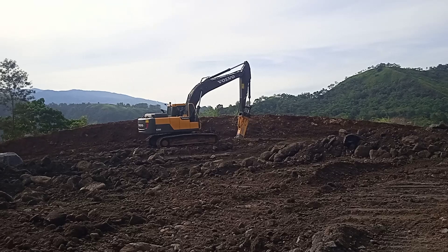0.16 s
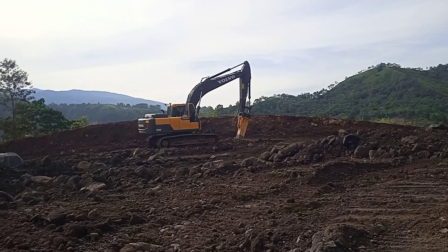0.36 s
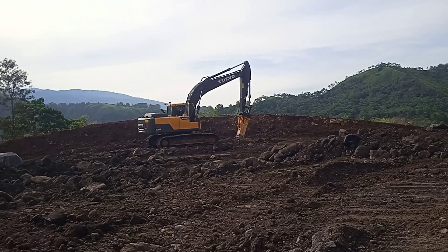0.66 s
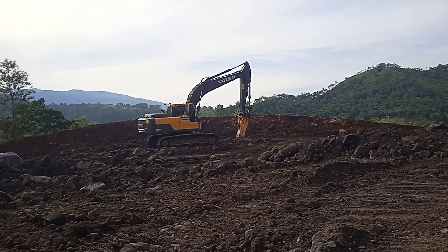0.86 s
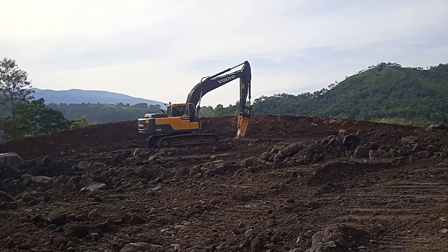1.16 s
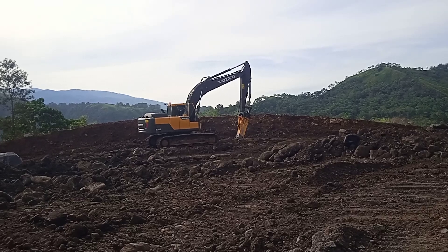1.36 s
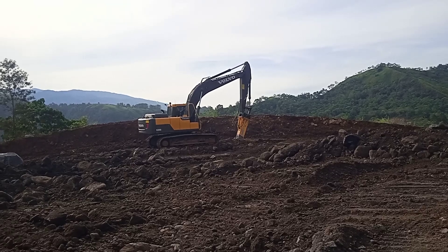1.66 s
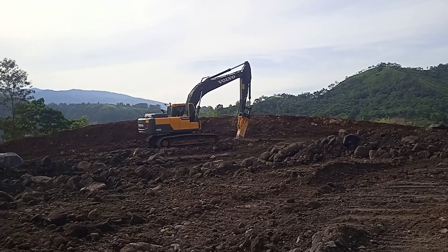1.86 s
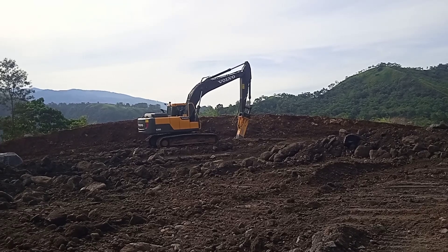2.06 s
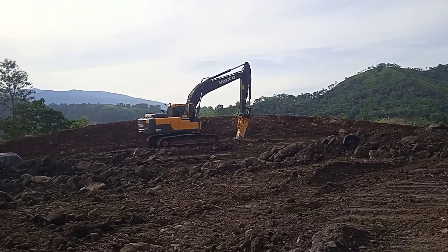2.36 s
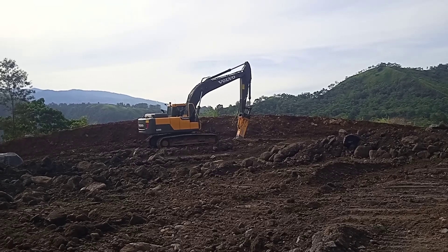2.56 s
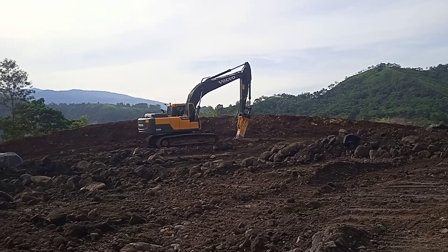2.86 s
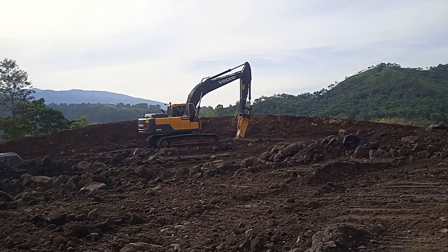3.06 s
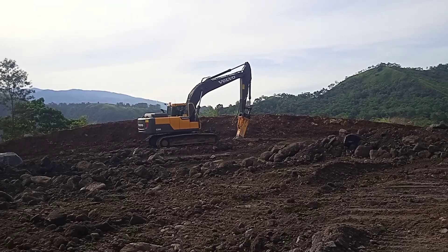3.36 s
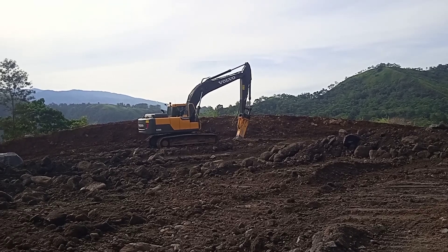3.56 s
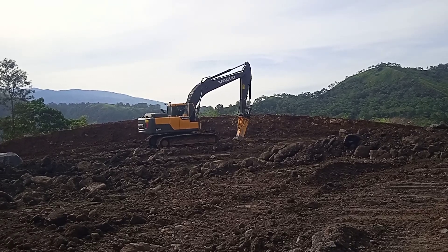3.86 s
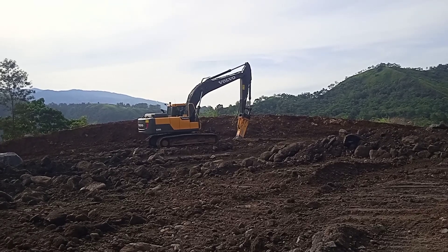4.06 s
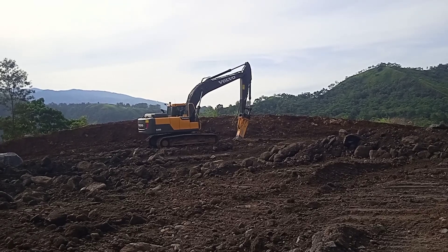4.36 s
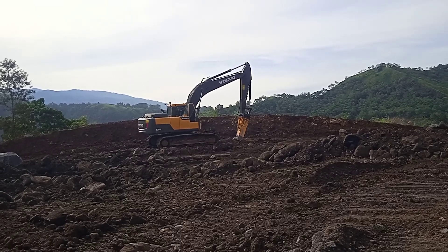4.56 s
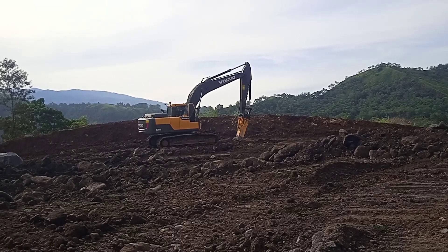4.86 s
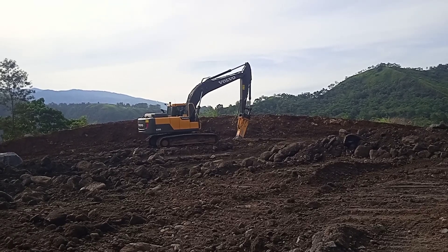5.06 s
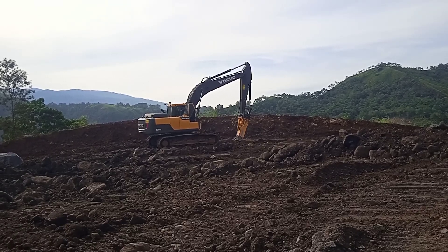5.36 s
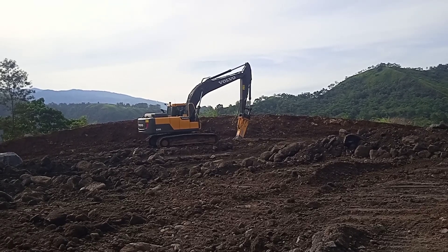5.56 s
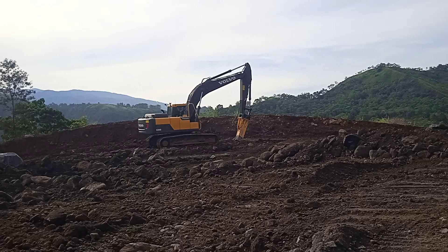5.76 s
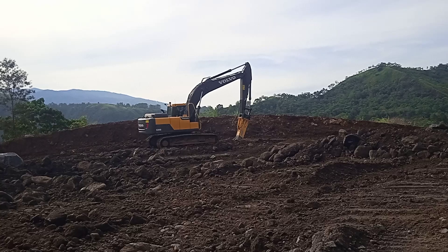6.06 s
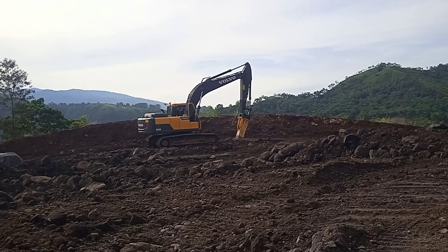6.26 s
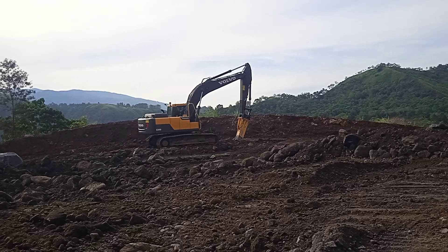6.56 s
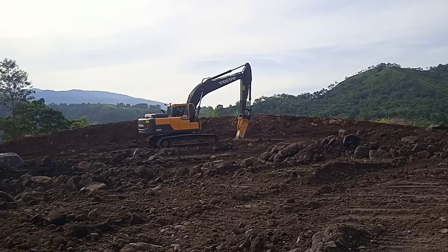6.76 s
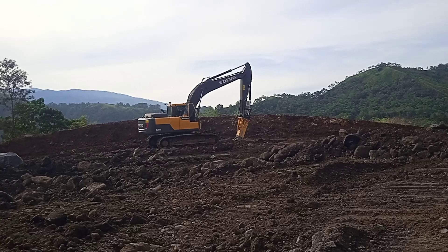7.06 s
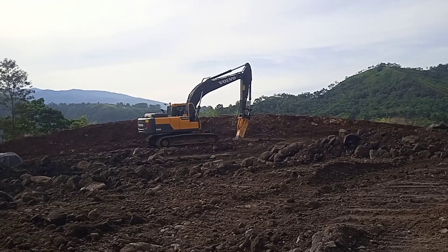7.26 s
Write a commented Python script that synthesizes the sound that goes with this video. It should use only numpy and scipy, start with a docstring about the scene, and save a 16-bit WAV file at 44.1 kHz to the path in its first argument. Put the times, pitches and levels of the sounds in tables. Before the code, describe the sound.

An excavator's hydraulic hammer pounds rock in rapid, rattling metallic blows over a diesel drone, pausing briefly midway before hammering again.

```python
"""An excavator breaks rock on open ground, some way off. From the start its hydraulic hammer pounds
nearly eight times a second over the diesel: the valve hisses, the piston cracks, the steel housing
rattles and rings, the ground thumps. After two seconds the rock crumbles and the chisel works loose,
clanking, then squealing. Just past four seconds the pounding stops, leaving three light hammer taps
over the diesel; near five it starts again and runs to the end."""
import sys
import numpy as np
from scipy import signal
from scipy.fft import rfft, irfft
from scipy.io import wavfile

SR = 44100
rng = np.random.default_rng(int(sys.argv[2]) if len(sys.argv) > 2 else 0)


def int16_out(signal):
    """Quantize to a 16-bit WAV file."""
    q = np.round(np.clip(np.atleast_2d(signal).T, -1, 1) * 32767)
    wavfile.write(sys.argv[1], SR, q.astype(np.int16))


N = 326781
TIME = np.arange(N) / SR
AGE = TIME[:SR // 3]   # seconds since a hit

# runs of the hammer: start_s, blow_count, interval_s, extra_starting_interval_s
HAMMER_RUNS = [(.0475, 33, .1285, .0034), (4.9477, 20, .12741, .0072)]
# weight and brightness of the blows: time_s, force_db, clank_db, treble_db
BLOW_LEVELS = [(0, -29, -24.5, -28), (1.0, -27.5, -26.5, -26.5), (2.0, -27.3, -27, -28),
               (3.1, -27, -27, -28.5), (4.1, -27.5, -27, -28.5), (4.95, -30, -26.5, -27),
               (5.2, -30, -32, -28.5), (6.0, -31.5, -30, -26), (6.75, -31.5, -31.5, -29.5),
               (7.41, -29, -27.5, -31.5)]
# rattle envelope by band: centre_hz, rise_s, hold_s, t60_s, likeness to the blow before (0-1)
RATTLE_BANDS = [(200, 0.013, 0.024, 0.078, 0.89), (508, 0.0093, 0.026, 0.37, 0.83),
                (830, 0.0033, 0.025, 0.18, 0.57), (1695, 0.0032, 0.016, 0.13, 0.52),
                (3420, 0.0033, 0.018, 0.15, 0.42), (6260, 0.0017, 0.017, 0.12, 0.77),
                (14900, 0.0028, 0.011, 0.065, 0.89)]
# tone colour of the rattle: frequency_hz, gain_db
HOUSING_EQ = [(100, -21), (200, -6), (300, 0), (450, 1.5), (700, -7.5), (1150, -3), (1600, 4.5),
              (2200, -2.5), (3400, -2.5), (4700, -9), (7300, -5), (8300, -17), (12500, -29.5), (14000, -25),
              (15300, -14)]
# broad resonances of the housing: centre_hz, width_hz, boost_db
HOUSING_PEAKS = [(1450, 140, 5), (2450, 250, 7.5), (2875, 280, 4.5), (3330, 230, 0.5), (3685, 133, 9),
                 (6455, 140, 7)]
# tone colour of steel hitting steel: frequency_hz, gain_db
KNOCK_EQ = [(150, -10), (400, 1.5), (800, 12.5), (1150, 4), (1500, 7.5), (3400, 8), (4700, 0), (6300, 5.5),
            (8500, -5.5), (12500, -24), (15300, -10)]
# ringing modes of housing and boom: pitch_hz, gain_db
STEEL_MODES = [(347, -16), (402, -15.5), (432, -20), (462, -15.5), (505, -12), (543, -16), (833, -16),
               (898, -16.5), (990, -9), (1191, -26), (1337, -7.5), (1520, -12.5), (1935, -14), (2256, -17),
               (2397, -7), (2547, -15.5), (3262, -15.5), (3385, -16.5), (3712, -29), (4152, -27),
               (5510, -14.5), (8835, -22.5), (9305, -21)]
# low-end weight as the chisel settles: time_s, thump_gain_db, boom_gain_db
LOW_END = [(0, 6.5, 2), (1.08, -1, -0.5), (1.22, 3, 5.5), (1.75, -1, -1), (2.3, 6.5, 2), (2.8, 0, 2.5),
           (5.3, 5, 3.5), (5.7, -2, -1), (7.41, -0.5, 4.5)]
# tone colour of the ground thump: frequency_hz, gain_db
THUMP_EQ = [(25, -11), (45, -16), (60, 3.5), (85, 5.5), (120, 5.5), (160, 15), (200, -9.5), (400, -28.5)]
# tone colour of falling chips: frequency_hz, gain_db
GRAVEL_EQ = [(250, 0), (600, 0.5), (1000, 2), (1700, 3.5), (2100, -5.5), (3200, -9), (8000, -24),
             (13000, -45)]
# spills of broken rock: start_s, length_s, level_db
ROCK_SPILLS = [(0, 0.13, -40), (2.355, 0.56, -46), (3.25, 0.66, -42.5)]
# pieces of stone cracking off: start_s, level_db
ROCK_CRUNCHES = [(1.555, -39), (3.356, -34), (3.744, -34), (3.922, -36), (5.375, -36.5)]
# tone colour of the oil hiss: frequency_hz, gain_db
VALVE_EQ = [(500, -38), (1500, -13), (3000, 6), (4500, -17), (7000, 2.5), (9000, -9.5), (12500, -21),
            (15300, -7)]
# notes from glancing blows: start_s, pitch_hz, level_db
GLANCING_PINGS = [(.312, 3730, -31), (1.226, 505, -26.5), (2.386, 990, -25), (2.515, 2400, -31.5),
                  (6.641, 5500, -35), (7.04, 5491, -41)]
# clanks of the loose chisel, then three light hammer taps in the last rows: start_s, knock_db, ring_db
CLANKS_AND_TAPS = [(2.219, -35.5, -48.5), (2.407, -36, -54), (2.547, -31.5, -53), (2.684, -29.5, -54),
                   (2.853, -35, -65), (3.324, -27, -51), (3.464, -29, -51.5), (3.595, -30, -50.5),
                   (3.722, -25, -51), (3.851, -29.5, -50), (3.982, -31.5, -55), (4.109, -31, -52),
                   (4.249, -31.5, -56), (4.41, -32.5, -53), (4.567, -32.5, -55), (4.793, -33.5, -59)]
# ringing modes of the chisel: pitch_hz, gain_db, t60_s
CHISEL_MODES = [(2430, 5, 0.25), (3210, 5, 0.3), (5900, 12.5, 0.17)]
# the chisel rubbing on rock: start_s, length_s, screech_db, singing_db
CHISEL_RUBS = [(3.251, 0.045, -64, -41), (3.312, 0.03, -58, -34), (3.755, 0.021, -39.5, -42),
               (3.794, 0.045, -54, -35.5), (3.876, 0.027, -56, -35), (4.016, 0.026, -76, -47),
               (4.164, .04, -74, -53), (4.26, 0.032, -72, -44)]
# high cluster of the screech: pitch_hz, gain_db
SCREECH_TONES = [(4301, -3), (6481, -2), (7440, -1), (8258, -1), (8635, -4), (10842, -16), (11117, -11),
                 (11423, -7), (13754, -6), (14233, -2), (14700, -8), (15009, -7), (15450, -9)]
# engine speed, sagging under load: time_s, firing_hz
ENGINE_SPEED = [(0.0, 76.7), (0.2, 76.8), (0.95, 83.77), (1.28, 83.1), (1.83, 80.34), (2.4, 81.27),
                (3.05, 86.8), (3.5, 85.7), (3.9, 81.2), (4.15, 80.9), (5.04, 89), (5.47, 88.17),
                (7.41, 90.4)]
# overtones of the exhaust: time_s, second_harmonic_db, third_harmonic_db
EXHAUST_OVERTONES = [(0, -44.5, -41.5), (1.3, -47, -51), (1.9, -47, -43), (3.2, -51.5, -60.5),
                     (4.15, -47, -48), (5.2, -41.5, -49.5), (7.41, -43, -55)]
# tone colour of exhaust and fan noise: frequency_hz, gain_db
ROAR_EQ = [(20, -53), (45, -12), (60, 0.5), (100, 5), (150, 0), (240, 3.5), (330, -8), (600, -7.5),
           (1500, -16), (3000, -25), (7000, -31.5), (13000, -52), (15300, -36)]

TWIN_OFFSET_HZ, TWIN_DB = 48, -10   # each chisel mode beats against a close, quieter twin


def hammer_blows(build_up_blows=3, slowing_s_per_blow=.000083, spread_db=1.1):
    """Time and force of each blow: a run starts sluggishly as oil pressure builds, later slows a touch."""
    times = []
    for start, count, interval, extra_interval in HAMMER_RUNS:
        blow = np.arange(count)
        build_up = extra_interval * build_up_blows * (1 - np.exp(-blow / build_up_blows))
        times.extend(start + interval * blow + build_up + slowing_s_per_blow * blow ** 2 / 2)
    times = np.array(times)
    return times, at_times(BLOW_LEVELS, times)[0] + spread_db * rng.standard_normal(len(times))


def piston_crack(times, force_db, trim_db=-1, t60_s=0.0093):
    """The piston meets the chisel with a hard crack, ahead of the rattle."""
    snaps = rng.standard_normal((len(times), len(AGE))) * from_db(-60 * AGE / t60_s)
    return colour(place(times, snaps * from_db(force_db + trim_db)[:, None]), KNOCK_EQ)


def housing_rattle(times, force_db, trim_db=2.0, scatter_db=-26.5):
    """Each blow rattles the housing, the lows swelling later; the slopes scatter a faint tail back."""
    _, clank_db, treble_db = at_times(BLOW_LEVELS, times)
    log_centres = np.log([row[0] for row in RATTLE_BANDS])
    log_hz = np.log(np.arange(len(AGE) // 2 + 1) * SR / len(AGE) + 1)
    scatter = from_db(scatter_db) * burst(0.018, 0.045, 0.86)
    blows = 0
    for solo, (hz, rise, hold, t60, likeness) in zip(np.eye(len(RATTLE_BANDS)), RATTLE_BANDS):
        crossover = np.sqrt(np.interp(log_hz, log_centres, solo))
        favoured = favoured_modes(len(times)) if hz > 1000 else 1
        noise = irfft(rfft(repeated_noise(likeness, len(times))) * crossover * favoured, len(AGE))
        band_db = treble_db if 5000 < hz < 10000 else clank_db if hz > 2700 else force_db
        envelope = np.hypot(burst(rise, hold, t60), scatter)
        blows += noise * envelope * from_db(band_db + trim_db)[:, None]
    return colour(place(times, blows), HOUSING_EQ, HOUSING_PEAKS)


def favoured_modes(count, spacing_hz=75, spread_db=4.0, likeness=0.932):
    """Each blow favours its own handful of the housing's many close modes: one EQ curve per blow."""
    mode_index = np.arange(len(AGE) // 2 + 1) * SR / len(AGE) / spacing_hz
    gains = from_db(spread_db * repeated_noise(likeness, count))
    return unit_rms(np.array([np.interp(mode_index, np.arange(len(AGE)), row) for row in gains]))


def steel_ring(times, force_db, trim_db=-0.5, shift_db=3.0, spread_db=4.0):
    """Housing and boom ring at fixed pitches; which ones stand out shifts as the chisel settles."""
    boom_db = -27.5 + at_times(LOW_END, times)[1]
    band_hz, *rise_hold_t60, _ = np.transpose(RATTLE_BANDS)
    tones, strengths = [], []
    for hz, gain_db in STEEL_MODES:
        envelope = burst(*[np.interp(hz, band_hz, column) for column in rise_hold_t60])
        tones.append(envelope * np.exp(2j * np.pi * hz * AGE))
        settling_db = shift_db * np.tanh(np.interp(times, TIME, drift(0.83)))
        accent_db = spread_db * rng.uniform(-1.07, 1, len(times))
        phase = rng.uniform(0, 2 * np.pi) + 1.24 * rng.standard_normal(len(times))
        drive_db = boom_db if hz < 700 else force_db
        strength = from_db(drive_db + gain_db + trim_db + settling_db + accent_db)
        strengths.append(strength * np.exp(1j * phase))
    return place(times, (np.transpose(strengths) @ np.array(tones)).real)


def ground_thump(times, force_db, trim_db=-8):
    """The rock takes each blow with a dull thump."""
    thump_db = force_db + trim_db + at_times(LOW_END, times)[0]
    thumps = repeated_noise(likeness=0.82, count=len(times)) * burst(0.00026, 0.01, 0.14)
    return colour(place(times, thumps * from_db(thump_db)[:, None]), THUMP_EQ)


def crumbling_rock(times, force_db, trickle_db=-18.5, grains_per_s=1000):
    """Every blow sheds a trickle of chips; now and then a piece cracks off or the rock spills."""
    # the three envelopes add as power
    trickle = place(times, np.outer(from_db(force_db + trickle_db), burst(0.027, 0.034, 0.88)) ** 2)
    spills = sum((from_db(db) * swell(start, length, rise_s=0.02, t60_s=2.3)) ** 2
                 for start, length, db in ROCK_SPILLS)
    crunch_s, crunch_db = np.transpose(ROCK_CRUNCHES)
    crunches = place(crunch_s, np.outer(from_db(crunch_db), burst(0.0049, 0.018, 0.18)) ** 2)
    clicks = (rng.random(N) < grains_per_s / SR) * rng.choice([-1, 1], N)
    size_db = 3 * np.minimum(rng.exponential(1, N), 2)
    clump_db = 2.5 * drift(8.8)
    gravel = unit_rms(colour(clicks * from_db(size_db + clump_db), GRAVEL_EQ))
    return gravel * np.sqrt(trickle + spills + crunches)


def valve_hiss(times, lead_s=.031, level_db=-45.5, spread_db=3.0):
    """Oil spurts through the valve just before each blow, as the piston turns round."""
    spurts = rng.standard_normal((len(times), len(AGE))) * burst(0.0051, 0.0084, 0.072)
    spurt_db = level_db + spread_db * rng.standard_normal((len(times), 1))
    return colour(place(times - lead_s, spurts * from_db(spurt_db)), VALVE_EQ)


def glancing_pings():
    """A glancing blow makes one mode of the steel ring out as a clear note."""
    envelope = burst(0.0034, 0.0087, 0.13)
    notes = [from_db(db) * envelope * np.sin(2 * np.pi * hz * AGE) for _, hz, db in GLANCING_PINGS]
    return place([row[0] for row in GLANCING_PINGS], notes)


def clanks_and_taps(ring_trim_db=2.5, spread_db=1.5):
    """The chisel knocks in its bushing or takes a light hammer tap: a clatter, then a beating ring."""
    times, knock_db, ring_db = np.transpose(CLANKS_AND_TAPS)
    envelope = np.hypot(burst(0.00052, 0.0042, 0.056), from_db(-8) * burst(0.0061, 0.018, 0.17))
    clatter = rng.standard_normal((len(times), len(AGE))) * envelope * from_db(knock_db)[:, None]
    rings = 0
    for hz, gain_db, t60 in CHISEL_MODES:
        strength = from_db(ring_db + gain_db + ring_trim_db - spread_db * rng.standard_normal(len(times)))
        twin_phase = 2 * np.pi * ((hz + TWIN_OFFSET_HZ) * AGE + rng.random((len(times), 1)))
        pair = np.sin(2 * np.pi * hz * AGE) + from_db(TWIN_DB) * np.sin(twin_phase)
        rings += strength[:, None] * pair * burst(0.00061, 0.011, t60)
    return colour(place(times, clatter), KNOCK_EQ) + place(times, rings)


def chisel_squeal(roughness=0.41, overtone_db=-15):
    """Steel slides on stone: the rod sings in a beating pair and an overtone, with a screech on top."""
    def rough_tone(hz, wander_hz=28):
        flutter = 1 + roughness * np.tanh(drift(110))
        return flutter * np.sin(2 * np.pi * np.cumsum(hz + wander_hz * drift(72)) / SR)
    screech_level, singing_level = 0, 0
    for start, length, screech_db, singing_db in CHISEL_RUBS:
        rub = swell(start, length, rise_s=0.003, t60_s=0.34)
        screech_level = np.hypot(screech_level, rub * from_db(screech_db))
        singing_level = np.hypot(singing_level, rub * from_db(singing_db))
    main_hz, overtone_hz = CHISEL_MODES[1][0], CHISEL_MODES[2][0]
    rod = rough_tone(main_hz) + from_db(TWIN_DB) * rough_tone(main_hz + TWIN_OFFSET_HZ)
    rod += from_db(overtone_db) * rough_tone(overtone_hz)
    screech = sum(from_db(db) * rough_tone(hz, wander_hz=22) for hz, db in SCREECH_TONES)
    return singing_level * rod + screech_level * screech


def diesel(fundamental_db=-41, roar_db=-42, waver_db=1.65, jitter=0.0045):
    """The exhaust drones at the firing rate and two overtones; its roar throbs with each firing."""
    firing_hz, = at_times(ENGINE_SPEED, TIME)
    phase = 2 * np.pi * np.cumsum(firing_hz * (1 + jitter * drift(21))) / SR
    drone = 0
    for harmonic, db in enumerate([fundamental_db, *at_times(EXHAUST_OVERTONES, TIME)], 1):
        amplitude = np.sqrt(2) * from_db(db + waver_db * drift(5.2))
        drone += amplitude * np.sin(harmonic * phase + rng.uniform(0, 2 * np.pi))
    throb = 1 + 0.11 * np.sin(phase)
    return drone + from_db(roar_db) * colour(rng.standard_normal(N) * throb, ROAR_EQ)


def machine_whine(pitch_hz=9700, level_db=-68, end_s=1.6):
    """A faint high whine from the machine fades out early on."""
    fade = np.clip(end_s - TIME, 0, 1)
    return from_db(level_db) * fade * np.sin(2 * np.pi * np.cumsum(pitch_hz + 20 * drift(23)) / SR)


def from_db(db):
    return 10 ** (np.asarray(db) / 20)


def unit_rms(x):
    return x / np.sqrt(np.mean(x ** 2) + 1e-20)


def at_times(rows, times):
    """Each column of an automation curve at the given times."""
    time_s, *columns = np.transpose(rows)
    return [np.interp(times, time_s, column) for column in columns]


def burst(rise_s, hold_s, t60_s, age=AGE):
    """Envelope of one hit: rises, holds, then dies away."""
    return (1 - np.exp(-age / rise_s)) * from_db(-60 * np.maximum(age - hold_s, 0) / t60_s)


def swell(start_s, hold_s, rise_s, t60_s):
    """The same envelope on the scene's timeline."""
    return burst(rise_s, hold_s, t60_s, age=np.maximum(TIME - start_s, 0))


def drift(rate_hz):
    """Smooth random modulation with a spread of 1."""
    hop, warm_up = 40, 2000
    pole = np.exp(-2 * np.pi * hop * rate_hz / SR)
    noise = rng.standard_normal(N // hop + warm_up + 2)
    slow = signal.lfilter([1], [1, -2 * pole, pole * pole], noise)[warm_up:]
    return np.interp(np.arange(N) / hop, np.arange(len(slow)), unit_rms(slow))


def repeated_noise(likeness, count):
    """One noise per blow, each partly the same as the one before."""
    noise = rng.standard_normal((count, len(AGE)))
    for k in range(1, count):
        noise[k] = likeness * noise[k - 1] + np.sqrt(1 - likeness ** 2) * noise[k]
    return noise


def colour(x, eq, peaks=(), size=8192):
    """Minimum-phase EQ with resonant peaks on top; white noise keeps its power."""
    hz = np.arange(size // 2 + 1) * SR / size
    eq_hz, eq_db = np.transpose(eq)
    db = np.interp(np.log(hz + 1), np.log(eq_hz), eq_db)
    for centre, width, boost_db in peaks:
        db += boost_db / (1 + (2 * (hz - centre) / width) ** 2)
    cepstrum = irfft(np.log(from_db(db)))
    response = irfft(np.exp(rfft(2 * cepstrum[:size // 2], size)))
    return signal.fftconvolve(x, response / np.linalg.norm(response))[:N]


def place(times, sounds):
    """Lay one sound at each time."""
    track = np.zeros(N + len(AGE))
    for start_s, sound in zip(times, sounds):
        at = int(np.clip(start_s * SR, 0, N))
        track[at:at + len(sound)] += sound
    return track[:N]


def scene():
    """The mono mix: hammer and rock in front, chisel accents, the engine as a bed."""
    times, force_db = hammer_blows()
    hammer = piston_crack(times, force_db) + housing_rattle(times, force_db) + steel_ring(times, force_db)
    rock = ground_thump(times, force_db) + crumbling_rock(times, force_db)
    accents = valve_hiss(times) + glancing_pings() + clanks_and_taps() + chisel_squeal()
    return (hammer + rock + accents + diesel() + machine_whine())[None]


def record(dry):
    """A steep low-pass takes off the very top."""
    cutoff_hz = 15750
    return signal.sosfilt(signal.ellip(10, .2, 80, cutoff_hz, fs=SR, output="sos"), dry)


dry = scene()
out = record(dry)
int16_out(out)
```